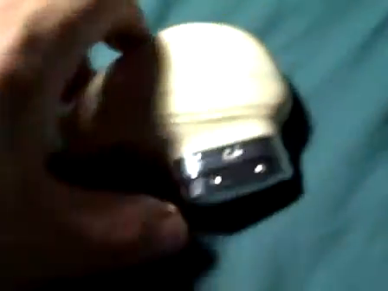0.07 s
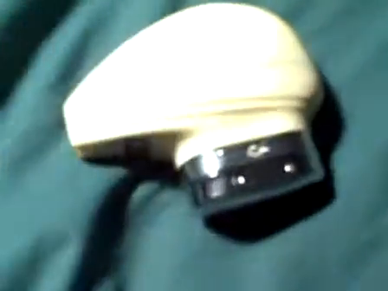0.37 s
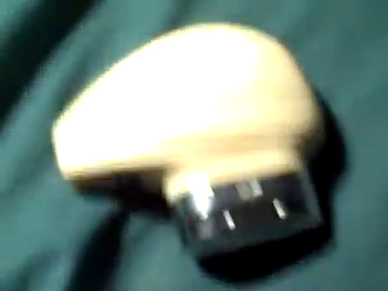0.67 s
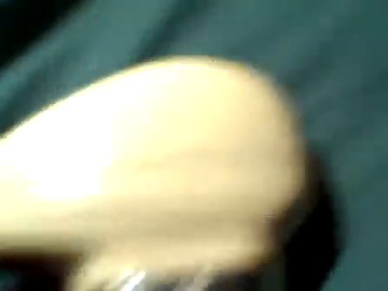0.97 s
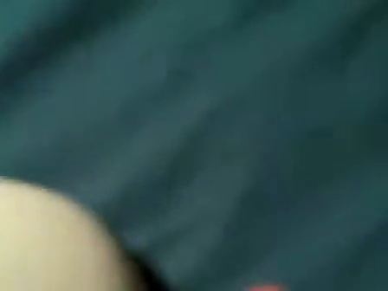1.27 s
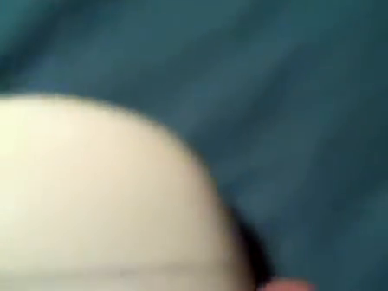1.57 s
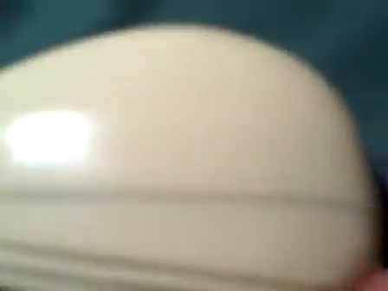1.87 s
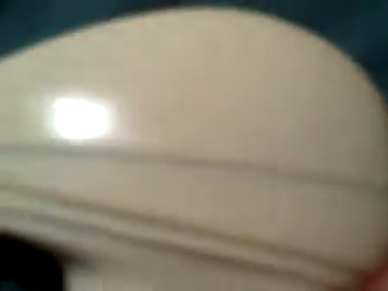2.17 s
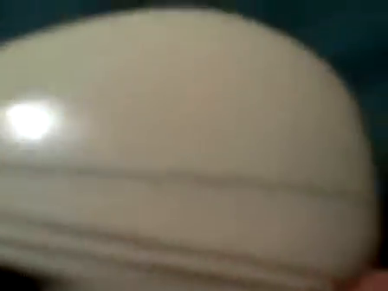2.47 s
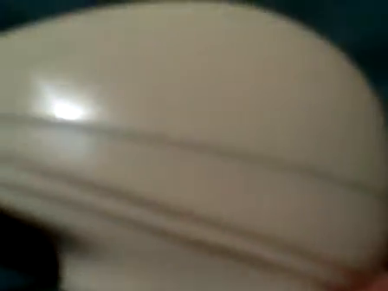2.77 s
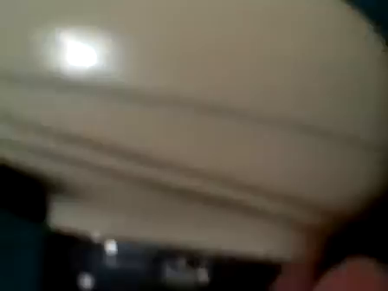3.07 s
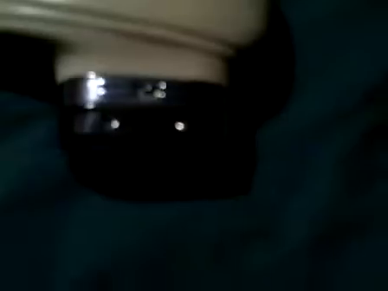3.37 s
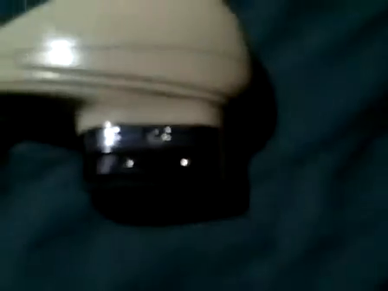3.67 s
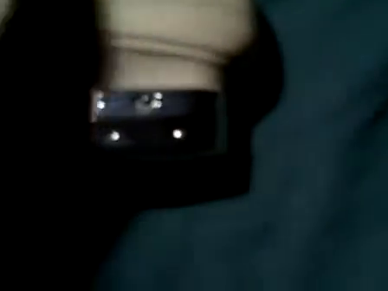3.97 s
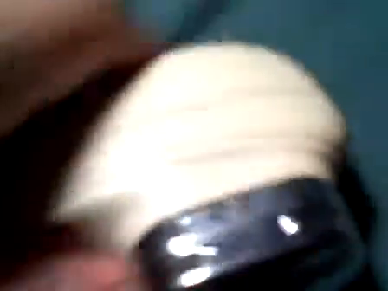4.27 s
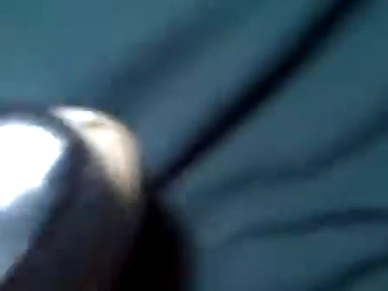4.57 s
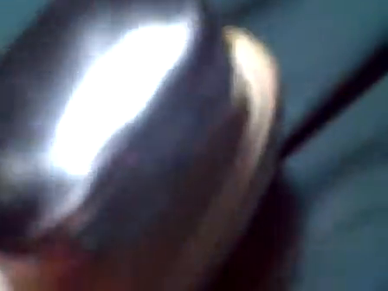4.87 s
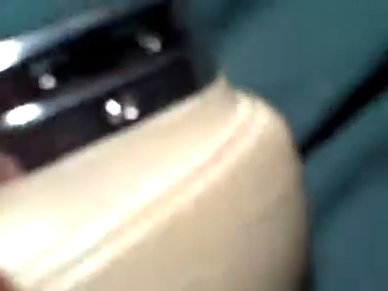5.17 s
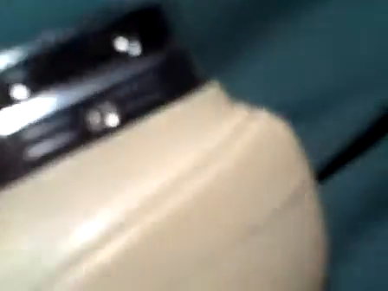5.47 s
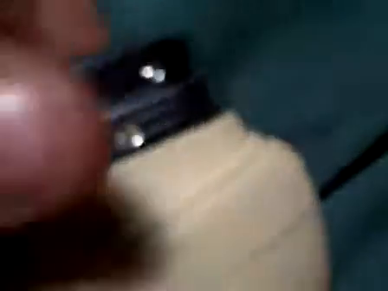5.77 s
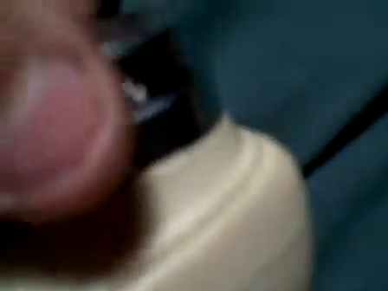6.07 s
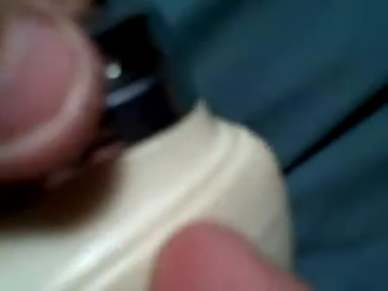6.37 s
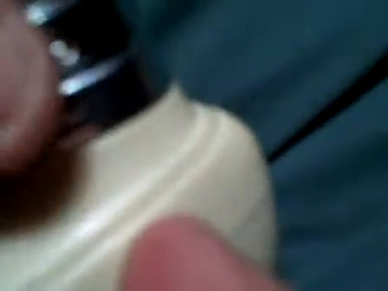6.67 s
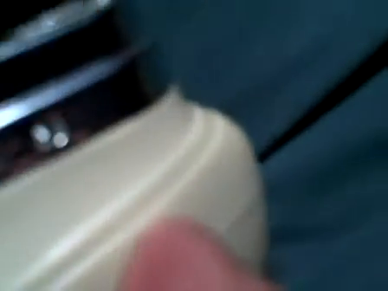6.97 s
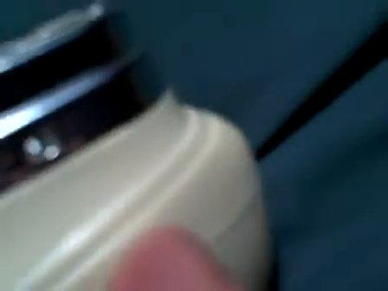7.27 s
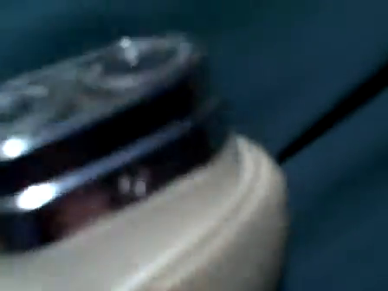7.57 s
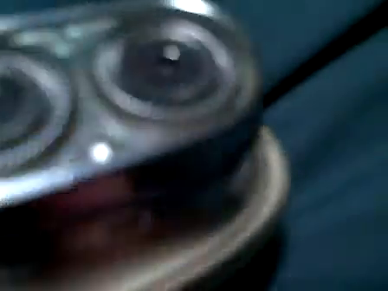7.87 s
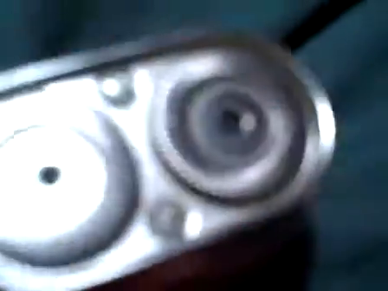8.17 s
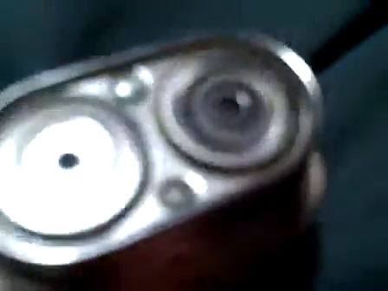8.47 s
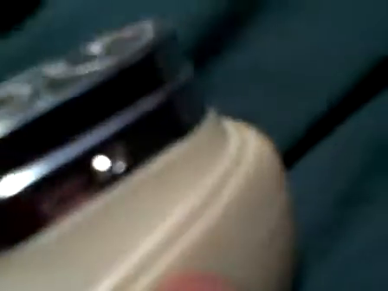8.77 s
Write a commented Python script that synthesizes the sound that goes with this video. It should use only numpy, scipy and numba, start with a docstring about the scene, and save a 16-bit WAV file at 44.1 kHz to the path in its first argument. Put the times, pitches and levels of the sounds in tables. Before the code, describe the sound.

In a quiet room, fingers rub softly over an electric shaver lying on bedding, with a few small plastic clicks. After about two seconds the switch snaps and the motor runs up into a steady, bright buzz, its cutters scraping and rattling over a faint hum. The metallic tone shifts as the shaver is turned. The microphone is close, with a low handling rumble and a couple of dull bumps.

```python
"""First come soft rubs and plastic clicks: a hand picks at a two-head rotary shaver lying on bedding.
The switch snaps and the motor slowly runs up, humming. Its geared cutters scrape and rattle in their
steel caps, which makes the caps and the plastic head ring. The ring changes as the hand turns the
shaver. Behind it are a quiet room and the thuds and rumble of a hand holding a small camera close by.
The microphone loses the highest treble and overloads a little."""
import sys
import numpy as np
from scipy import signal
from scipy.fft import rfft, irfft, next_fast_len
from scipy.io import wavfile
from numba import njit

SR = 44100
rng = np.random.default_rng(int(sys.argv[2]) if len(sys.argv) > 2 else 0)


def master(y):
    """Save y as 16-bit WAV."""
    cut = np.clip(np.atleast_2d(y).T, -1, 1)
    pcm = np.round(cut * 32767)  # scale
    wavfile.write(sys.argv[1], SR, pcm.astype(np.int16))


N = 388962
TIME = np.arange(N) / SR

# where a cutter catches on its way round: (place/turns, width/turns, strength)
CATCHES = [(.1, 0.034, 1.4), (.31, 0.065, 0.47), (.56, .06, .8), (.94, 0.16, 0.53)]
# tone colour of the broad scrape: (f/Hz, level/dB)
SCRAPE_COLOUR = [(40, -0.5), (120, 1), (300, 0.5), (1500, 0.5), (2400, 1.5), (4000, 4.5), (5300, 4.5),
                 (6500, 7), (7500, 6), (8400, -2), (9500, -5.5)]
# how the steel caps ring, one list per cap: (f/Hz, width/Hz, level/dB)
CAP_MODES = [
    [(6092, 625, 1)],
    [(6573, 980, 1.5), (7210, 330, -18.5)],
]
# how much louder the lower-pitched cap is than the other: (t/s, level/dB)
CAP_BALANCE = [(2.8, -5.5), (4, 4.5), (4.48, -4), (4.68, 8.5), (5.2, -2.5), (6, 8), (6.55, -2), (6.85, -1),
               (7.2, -4), (8.1, 2), (8.6, -3.5)]
# how housing, hair chamber, head frame and cap holder ring: (f/Hz, width/Hz, level/dB, share of bend)
HEAD_MODES = [(3188, 960, 0.5, 0), (3730, 910, -1, 0), (4782, 680, 1.5, 0.8), (5420, 960, -0.5, 0.26)]
# fingers around the head bend the pitch of its ring: (t/s, pitch factor)
BEND = [(2, 0.98), (4.2, 1.037), (4.55, 1.005), (5, 0.92), (5.5, 1.025), (6.2, 1), (7.7, 0.98), (8.8, 0.97)]
# how strongly hair chamber, head frame and cap holder ring over time: (t/s, level/dB)
CHAMBER_LEVEL = [(2.9, -35), (3.2, -24), (3.5, -24.5), (4.2, -24.5), (4.55, -21.5), (5.7, -21),
                 (6.9, -27.5), (7.25, -18.5), (7.75, -29), (8.8, -32)]
FRAME_LEVEL = [(2.4, -25.5), (2.95, -19), (3.2, -24), (4.25, -19.5), (4.55, -17.5), (4.72, -26.5),
               (5.15, -22), (5.65, -17), (6.05, -19.5), (6.4, -17.5), (7.7, -15.5), (8.05, -17.5),
               (8.8, -15.5)]
HOLDER_LEVEL = [(2.2, -19.5), (2.85, -15.5), (3.2, -24), (4.1, -26), (4.4, -19), (4.8, -17), (5.3, -26),
                (6, -22.5), (8.8, -23.5)]
# turning the shaver trades the bright caps (0) for the lower ring of the housing (1): (t/s, facing)
FACING = [(2.3, .9), (2.48, 0.71), (2.75, 1), (3.35, 0.36), (4, 0.3), (4.25, 0.65), (5.4, 0.098),
          (5.75, 0.33), (6.45, 0.17), (6.95, 0), (7.4, .45), (8.1, 0.88), (8.35, 1)]
# the head gets louder and softer as it moves nearer and farther: (t/s, level/dB)
NEARNESS = [(2.48, 1), (2.62, -0.5), (3.4, -0.4), (3.8, -2), (4.1, 0.3), (4.15, -4), (4.45, .5),
            (4.62, -0.5), (5.1, 3), (5.5, 3.5), (5.8, 0.2), (6.2, 2), (6.53, 0.5), (6.88, 2), (7.1, 0),
            (7.35, -1), (8.05, 1.5), (8.4, -1.4)]
# the cutters run freer or tighter: (t/s, speed factor)
FREENESS = [(2.4, .99), (4, 1.005), (4.5, 1.011), (5, 1.044), (6, 1.017), (6.5, 1.025), (7, .997),
            (8, 1.002), (8.82, 1.047)]
# hum of the commutator, the motor's turning contact: (multiple of the shaft speed, level/dB)
HUM_TONES = [(3, -43.5), (4, -44.5), (6, -46)]
# shake of the unbalanced shaft, as the grip passes it on: (t/s, level/dB)
IMBALANCE = [(2.7, -54), (3, -37), (3.4, -44.5), (5, -48), (6, -44), (6.9, -35), (7.6, -50), (8.5, -35.5),
             (8.82, -44)]
# fingers and cloth rubbing: (t/s, length/s, level/dB, share of dull rub, share of squeak)
RUBS = [(0.26, 0.15, -48.5, 0.04, 0), (.335, 0.056, -46, 0, .1), (0.41, 0.11, -40, 0.07, .1),
        (0.687, 0.1, -40.5, 0.06, 0.2), (0.711, 0.027, -39, 0.13, 0.4), (0.908, 0.078, -49, 0.7, 0),
        (1.045, 0.3, -50, 0.04, 0.05), (1.477, 0.046, -50, .1, 0), (1.757, 0.061, -47, 0.1, 0),
        (1.984, 0.075, -46, 0.1, 0)]
# clicks of the grip and the slide switch: (t/s, level/dB, decay/s, added shell ring/dB)
CLICKS = [(.77, -49, .001, 0), (1.275, -45, .001, -15), (1.512, -27, 0.0015, -10), (1.9416, -39, .003, -20),
          (1.972, -43, .002, -19), (2.0065, -24.5, 0.009, -19), (2.018, -21, 0.0082, -26),
          (2.058, -20, 0.0045, -23)]
# tone colours of a rub and of a click: (f/Hz, level/dB)
RUB_COLOUR = [(150, -17), (700, -18), (2500, -10), (4000, -9.5), (5000, -5.5), (6500, 3.5), (7500, -7),
              (9000, -19)]
CLICK_COLOUR = [(100, -19), (350, -25), (600, -7), (1600, -17), (2500, -6.5), (4500, -11), (6500, 7),
                (7500, -8), (9000, -16)]
# soft bumps and steady rumble of the hand on the camera: (t/s, level/dB)
BUMPS = [(1.515, -41), (1.84, -50), (4.2, -30), (5.39, -25)]
RUMBLE_LEVEL = [(.3, -57), (.8, -44.5), (1.35, -47), (2, -36.5), (3, -43)]
# tone colour of the room and microphone hiss: (f/Hz, level/dB)
HISS_COLOUR = [(60, -7), (100, -5.5), (125, -1.5), (150, -16), (185, -8.5), (300, -14), (470, -19),
               (1200, -26.5), (2300, -26.5), (3800, -23), (4600, -24.5), (6300, -13.5), (7450, -18.5),
               (9000, -41)]
# the room's low drone: (t/s, level/dB)
DRONE_LEVEL = [(1.15, -42.5), (1.5, -51), (1.8, -41), (3, -46.5)]
# faint steady tones early on: (start t/s, end t/s, f/Hz, level/dB)
FAINT_TONES = [(-.1, 2.4, 240, -60), (.93, 1.65, 3885, -68.5), (1.1, 1.6, 2449, -72)]

ON_S = 2.03  # the motor starts
GEAR_RATIO = 2.185  # motor turns for one turn of the cutters


def shaver(build_s=0.25):
    """The motor hums and drives the cutters through gears; the sound builds up after switching on."""
    speed = motor_speed()
    turns = np.cumsum(speed) / SR
    force = cutter_force(turns / GEAR_RATIO)
    head = undb(curve(NEARNESS)) * ringing_head(force)
    swell = 1 - np.exp(-np.maximum(TIME - ON_S, 0) / build_s)
    return swell * (head + motor_hum(turns, speed))


def cutter_force(turns, sliding=1.0, uneven_db=4.0, grit_db=2.5, drift_db=0.27):
    """Blades push on the caps: steady sliding, catches that come back each turn, and fine grit."""
    place = turns + 0.014 * wander(90)
    catches = 0
    for at, width, strength in CATCHES:
        distance = (place - at + .5) % 1 - .5
        catches += strength * np.exp(-(distance / width) ** 2)
    # the cutters sit on springs, so tanh limits how big a catch or a grain can get
    force = sliding + catches * undb(uneven_db * np.tanh(wander(210)))
    return unit(force * undb(grit_db * np.tanh(wander(1500)) + drift_db * wander(35)))


def ringing_head(force, scrape_db=-18, waver_db=1.23, waver_rate=9):
    """Scraping makes the steel caps and plastic parts ring; each wavers in the unsteady hand."""
    facing, balance_db, bend = curve(FACING), curve(CAP_BALANCE), curve(BEND)
    caps_db, housing_db = -13.5 - 4.5 * facing, -33.5 + 14 * facing
    head = undb(scrape_db) * colour(force * noise(), SCRAPE_COLOUR)
    for modes, cap_db in zip(CAP_MODES, (caps_db + balance_db / 2, caps_db - balance_db / 2)):
        cap = sum(undb(db) * ring(force * noise(), hz, width) for hz, width, db in modes)
        head += undb(cap_db + waver_db * wander(waver_rate)) * cap
    frame_db = curve(FRAME_LEVEL) + finger_muffle()
    parts_db = (housing_db, curve(CHAMBER_LEVEL), frame_db, curve(HOLDER_LEVEL))
    for (hz, width, db, share), part_db in zip(HEAD_MODES, parts_db):
        gain = undb(db + part_db + waver_db * wander(waver_rate))
        head += gain * ring(force * noise(), hz * bend ** share, width)
    return head


def finger_muffle(on_s=6.52, off_s=6.83, press_s=0.19, lift_s=0.012, depth_db=-12):
    """Drop in the frame's ring, in dB, as a finger settles on it slowly and lets go at once."""
    pressure = np.minimum((TIME - on_s) / press_s, (off_s - TIME) / lift_s)
    return depth_db * np.clip(pressure, 0, 1)


def motor_speed(start_hz=30, full_hz=144, halfway_s=.41):
    """Turns per second: the motor speeds up, then slowly levels off; friction makes it waver."""
    running_s = np.maximum(TIME - ON_S, 0)
    run_up = full_hz - (full_hz - start_hz) * halfway_s / (halfway_s + running_s)
    return run_up * curve(FREENESS) * (1 + 0.00502 * wander(9))


def motor_hum(turns, speed):
    """The commutator hums louder with speed, and the unbalanced shaft shakes once per turn."""
    hum = sum(undb(db + 2 * wander(1.9)) * np.sin(2 * np.pi * k * turns) for k, db in HUM_TONES)
    shake = undb(curve(IMBALANCE)) * np.sin(2 * np.pi * turns)
    return hum * speed / speed.max() + shake


def rubs(grain_db=2):
    """Skin and cloth slide in grainy swells: hissing, dull or slightly squeaky."""
    grains = noise() * undb(grain_db * wander(500))
    bright = colour(grains, RUB_COLOUR)
    dull, squeak = ring(grains, hz=930, width=1260), ring(grains, hz=4650, width=800)
    out = np.zeros(N)
    for s, length, db, dullness, squeakiness in RUBS:
        rub = (1 - dullness) * bright + dullness * dull + squeakiness * squeak
        out += undb(db) * hump(s, length) * rub
    return out


def clicks(shell_hz=1090, shell_decay_s=.005):
    """Plastic snaps with a short crack, and the hollow shell rings briefly."""
    out, crack = np.zeros(N), colour(noise(), CLICK_COLOUR)
    age = np.arange(SR // 10) / SR
    shell = np.sin(2 * np.pi * shell_hz * age) * np.exp(-age / shell_decay_s)
    for s, db, decay, ring_db in CLICKS:
        span = int(s * SR) + np.arange(len(age))
        out[span] += undb(db) * (crack[span] * np.exp(-age / decay) + undb(ring_db) * shell)
    return out


def bumps(thud_hz=190, length_s=0.014):
    """The hand knocks the camera, whose body carries the dull thuds."""
    thud = ring(noise(), thud_hz, width=220)
    return thud * sum(undb(db) * hump(s, length_s) for s, db in BUMPS)


def background(hiss_db=-49.5, fade_s=.1):
    """Room hiss, a low drone, the rumble of the hand and a few faint tones."""
    hiss = undb(hiss_db + wander(10)) * colour(noise(), HISS_COLOUR)
    drone = undb(curve(DRONE_LEVEL)) * ring(noise(), hz=56.2, width=18.4)
    rumble = undb(curve(RUMBLE_LEVEL)) * ring(noise(), hz=26.5, width=18.6)
    tones = np.zeros(N)
    for start, end, hz, db in FAINT_TONES:
        fade = np.clip(np.minimum(TIME - start, end - TIME) / fade_s, 0, 1)
        tones += undb(db + 1.5 * wander(8.5)) * fade * np.sin(2 * np.pi * hz * TIME)
    return hiss + drone + rumble + tones


def undb(db):
    """Turn decibels into a factor to multiply by."""
    return 10 ** (np.asarray(db) / 20)


def unit(x):
    """Scale to an average size (rms) of 1."""
    return x / np.sqrt(np.mean(x ** 2))


def curve(table):
    """Join (t/s, value) points with straight lines."""
    return np.interp(TIME, *np.transpose(table))


def hump(peak_s, length_s):
    """A smooth rise and fall, shaped like a bell."""
    return np.exp(-(2 * (TIME - peak_s) / length_s) ** 2)


def noise():
    """White noise: an even hiss."""
    return rng.standard_normal(N)


def wander(rate):
    """Glide to a new random value rate times a second; rms 1."""
    return unit(np.interp(TIME * rate, np.arange(N), noise()))


def colour(x, points):
    """Shape the lows and highs of x along (f/Hz, level/dB) points; rms 1."""
    hz, db = np.transpose(points)
    size = next_fast_len(N + 4096)
    bin_hz = np.maximum(np.arange(size // 2 + 1) * SR / size, 1)
    gain = undb(np.interp(np.log(bin_hz), np.log(hz), db))
    return unit(irfft(rfft(x, size) * gain, size)[:N])


@njit
def band_pass(x, hz, width):
    """Keep the sound near a pitch that may move (a state-variable filter)."""
    y, band_state, low_state = np.empty(len(x)), 0., 0.
    for i in range(len(x)):
        tuning, damping = np.tan(np.pi * hz[i] / SR), width / hz[i]
        band = (band_state + tuning * (x[i] - low_state)) / (1 + tuning * (tuning + damping))
        band_state = 2 * band - band_state
        low_state += 2 * tuning * band
        y[i] = damping * band
    return y


def ring(x, hz, width):
    """Make x ring near hz with two filters in a row, each width Hz wide; rms 1."""
    centre = hz * np.ones(N)
    once = band_pass(x, centre, float(width))
    return unit(band_pass(once, centre, float(width)))


def scene():
    """Everything is close to one microphone; the bedding leaves no echo."""
    return (shaver() + rubs() + clicks() + bumps() + background())[None]


def record(dry, input_limit=0.96, mic_hz=8306, second_limit=0.69, treble_hz=14500, top_hz=15700):
    """The microphone flattens loud peaks, cuts the high treble, then flattens and filters again."""
    overloaded = np.clip(dry, -input_limit, input_limit)
    narrow = signal.sosfilt(signal.butter(20, mic_hz, fs=SR, output="sos"), overloaded)
    clipped = np.clip(narrow, -second_limit, second_limit)
    soft = signal.sosfilt(signal.butter(1, treble_hz, fs=SR, output="sos"), clipped)
    return signal.sosfilt(signal.ellip(10, .1, 80, top_hz, fs=SR, output="sos"), soft)


dry = scene()
out = record(dry)
master(out)
```